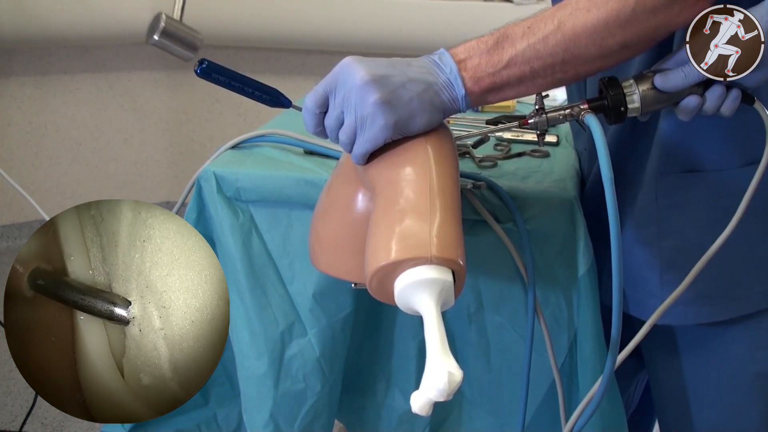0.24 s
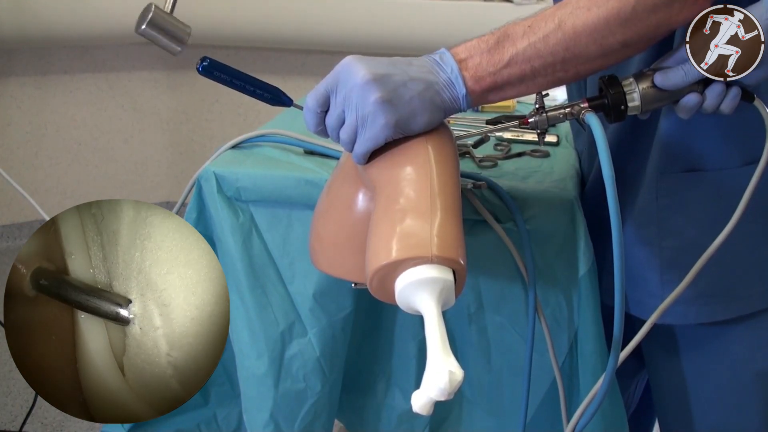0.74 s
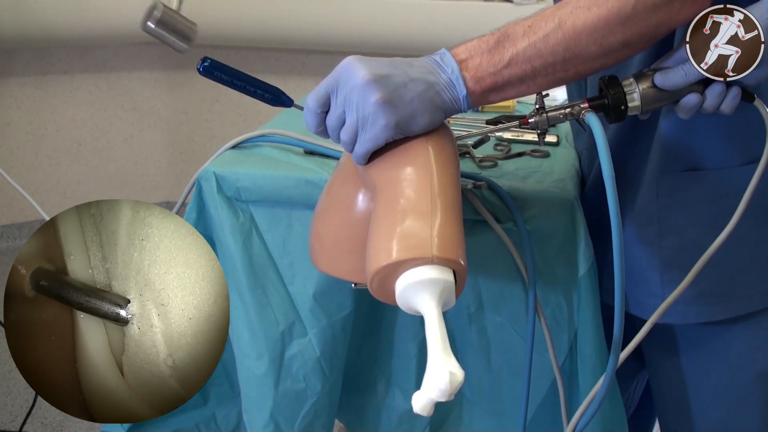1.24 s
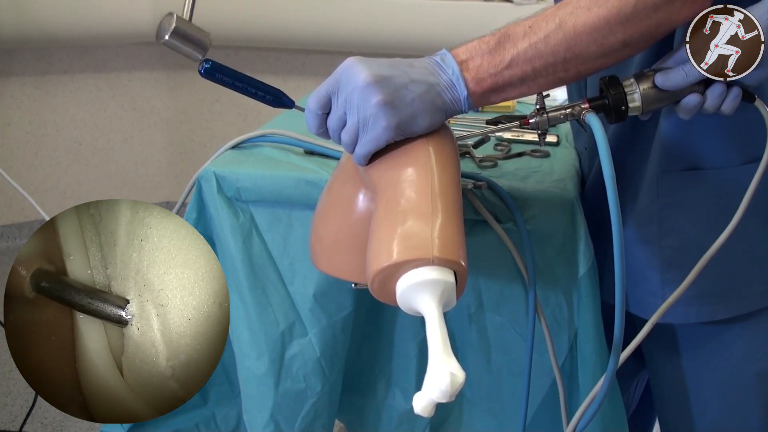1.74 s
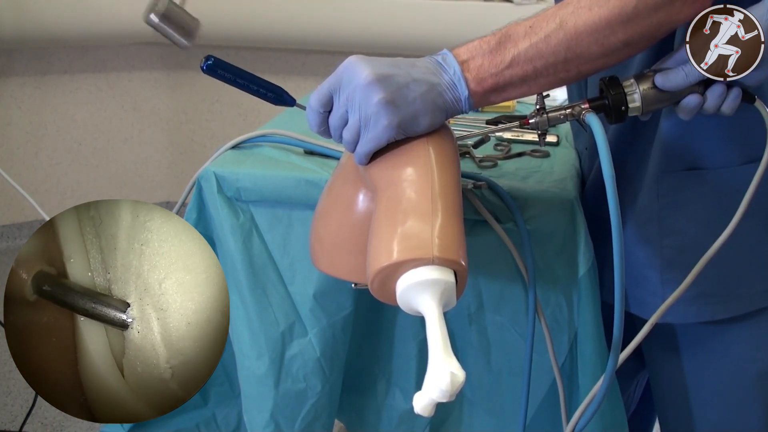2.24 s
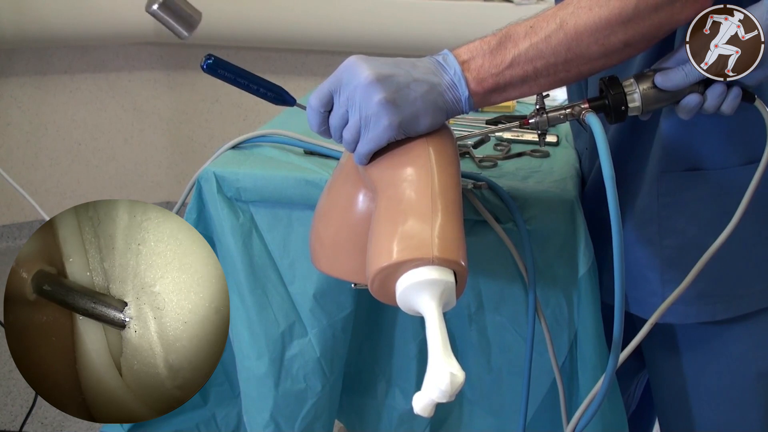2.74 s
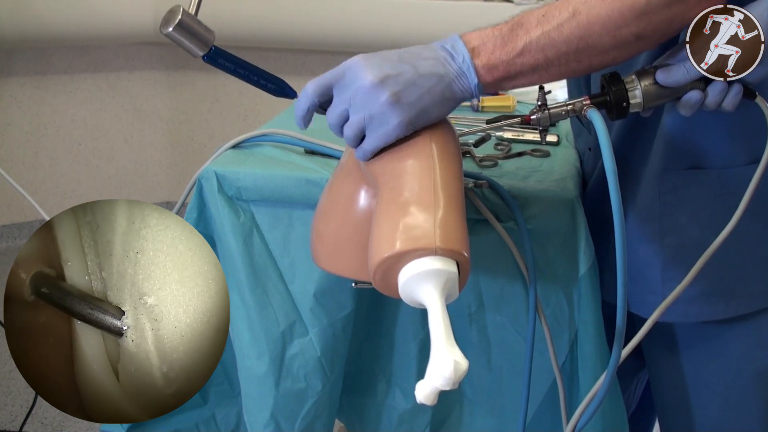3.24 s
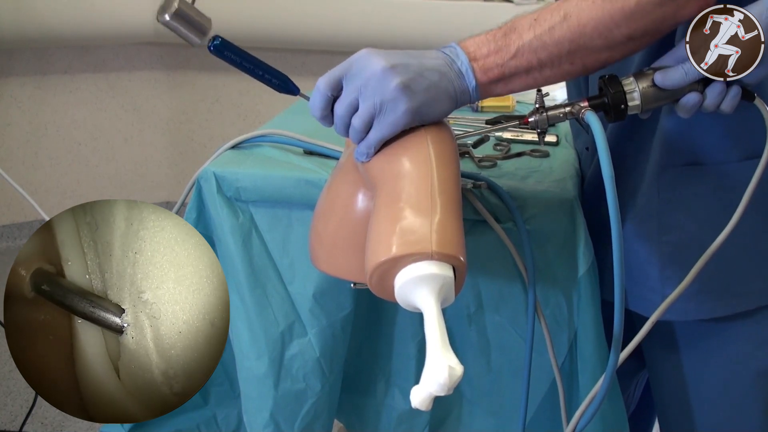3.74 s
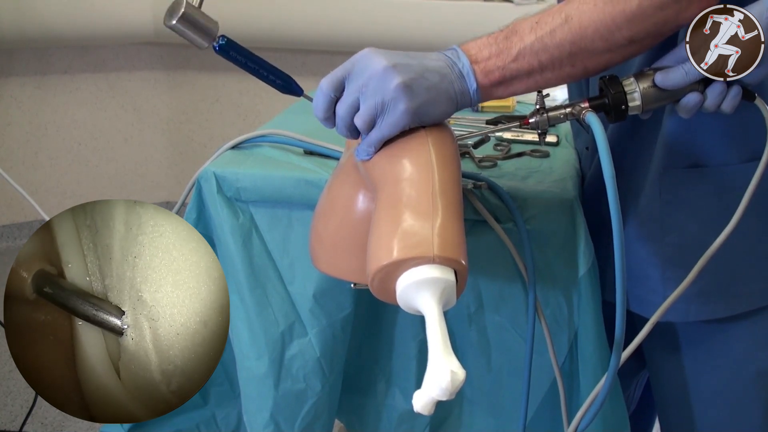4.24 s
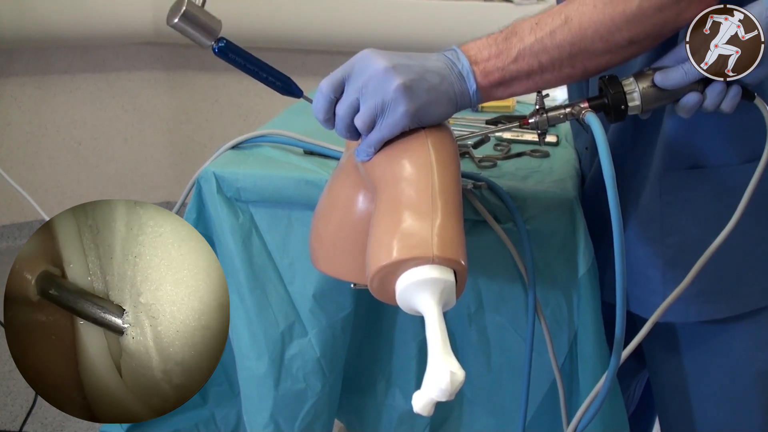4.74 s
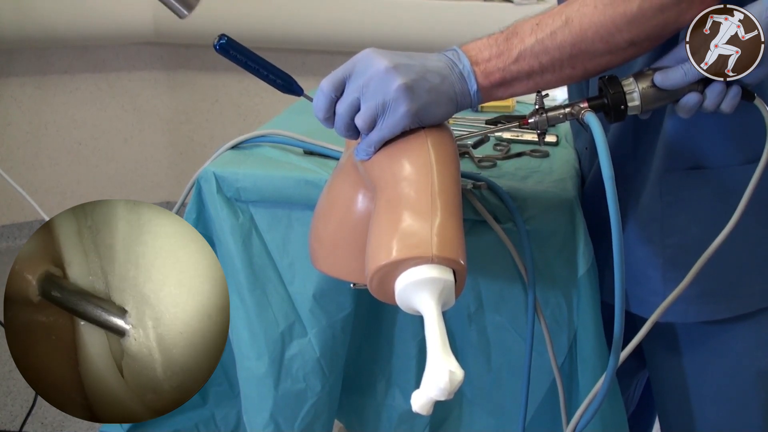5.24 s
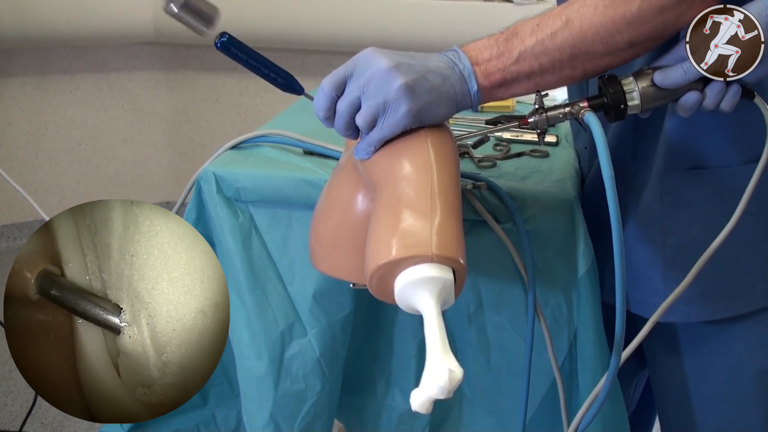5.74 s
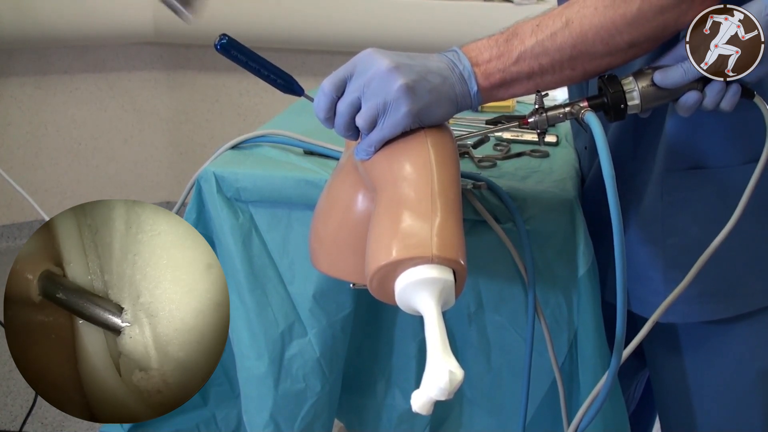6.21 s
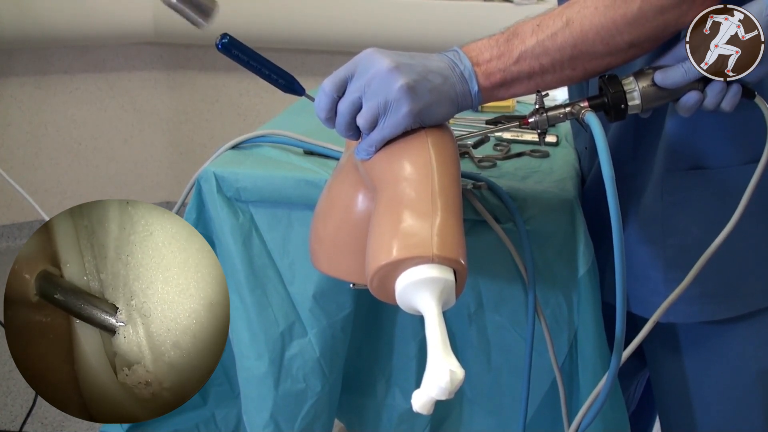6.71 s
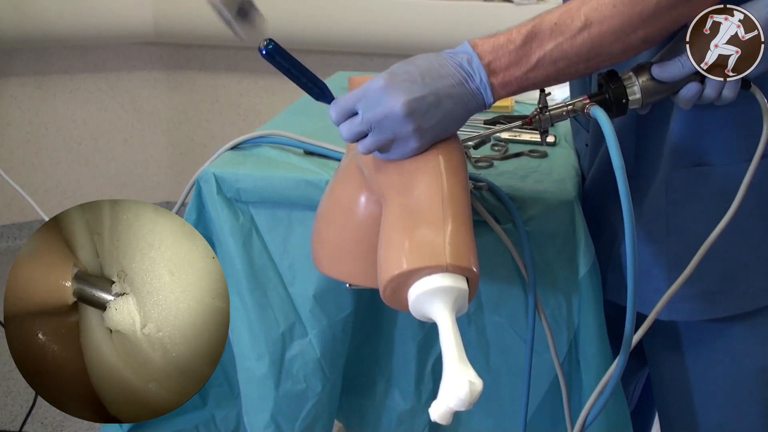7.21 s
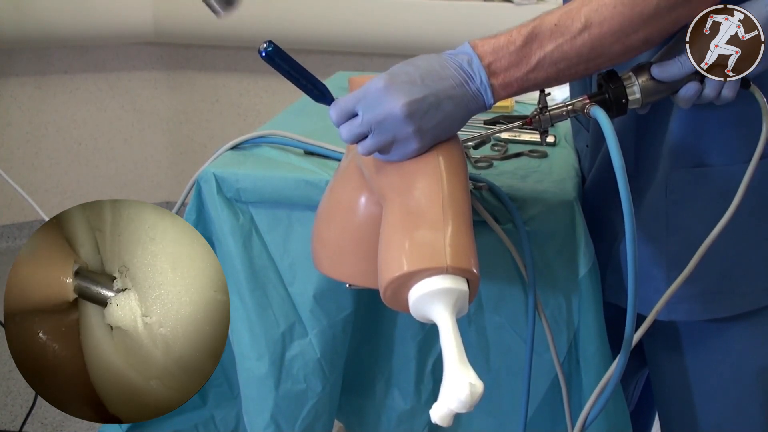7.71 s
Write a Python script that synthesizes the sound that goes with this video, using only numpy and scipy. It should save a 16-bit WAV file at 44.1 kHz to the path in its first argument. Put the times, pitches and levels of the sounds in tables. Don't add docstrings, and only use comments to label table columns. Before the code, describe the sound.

In a small hard-walled room, soft ventilation noise with a slightly wavering rumble and a thin, faint fan whine runs throughout. At the very start a steel mallet barely touches a steel awl, then from about 0.2 s it taps quickly, settling to roughly three blows a second. Each blow is a dry crack and bright steel click, a short thud from the padded model and table, and a brief high ring of the mallet head, followed by close echoes, a small room tail and a very faint shimmer of loose instruments. Taps strengthen slightly until 2.6 s, weaken, and almost miss near 3.4 s. From 3.7 s they return firmer, with a deeper thud as the point seats, and keep growing through 6.6 s. From 6.9 s four hard blows come, the loudest, slightly clipped at the camera microphone, the last at 7.9 s just before the end.

```python
import sys
import numpy as np
from scipy import signal
from scipy.fft import rfft, irfft
from scipy.io import wavfile
from scipy.ndimage import uniform_filter1d

SR = 44100
rng = np.random.default_rng(int(sys.argv[2]) if len(sys.argv) > 2 else 0)


def dump(signal):
    limited = np.clip(np.atleast_2d(signal).T, -1, 1)
    pcm = np.round(limited * 32767).astype(np.int16)
    wavfile.write(sys.argv[1], SR, pcm)


def undo_db(level):
    steps = np.asarray(level, float) / 20
    return 10 ** steps


N = 351463


def decay(t, t60_s):
    return np.exp(-np.log(1000) * t / t60_s)


def ring(modes, t, detune, scatter_db):
    hz, db, t60_s = np.transpose(modes)[:, :, None]
    level_chance, pitch_chance = rng.standard_normal((2, len(modes), 1))
    envelope = undo_db(db + scatter_db * level_chance) * decay(t, np.maximum(t60_s, .002))
    sines = -envelope * np.sin(2 * np.pi * hz * (1 + detune * pitch_chance) * t)
    return np.array([sines[0::2].sum(axis=0), sines[1::2].sum(axis=0)])


def band_pass(x, low_hz, high_hz):
    return signal.sosfilt(signal.butter(2, [low_hz, high_hz], "bandpass", fs=SR, output="sos"), x)


def crack(burst, top_db):
    middle = undo_db(-6) * band_pass(burst, 820, 5660)
    top = undo_db(top_db) * band_pass(burst, 8400, 21000)
    return np.array([middle, top])


# f/Hz, level/dB, t60/s
HANDLE_MODES = [(1011, -13.5, 0.024), (1330, -18.5, 0.013), (1965, -12, 0.011), (2536, -7, 0.01),
                (2880, -11.5, 0.012), (4430, -18, 0.0055)]


def handle(t, seat):
    HANDLE_DB, GRIP_DB, SEAT_DB = -7, 1, -2.5
    return undo_db(HANDLE_DB + GRIP_DB + SEAT_DB * seat) * ring(HANDLE_MODES, t, .02, 1.5)


# f/Hz, level/dB, t60/s
FACE_MODES = [(5830, -5, 0.0045), (6650, 3.5, 0.0039), (7005, -11, 0.013), (8950, -16.5, 0.0068),
              (10300, -15, .005)]


def faces(t, seat, free_db):
    FACES_DB, BRIGHT_DB, SEAT_DB = 11.5, -18.5, -2
    FREE_DB_PER_DB = -0.058
    return undo_db(FACES_DB + BRIGHT_DB + FREE_DB_PER_DB * free_db + SEAT_DB * seat) * ring(FACE_MODES, t, .012, 1)


# f/Hz, level/dB, t60/s
MODEL_MODES = [(317, -11.5, 0.052), (358, -6.5, 0.03), (450.2, 0, 0.039), (588, -2.5, 0.025),
               (707.5, -6, 0.039), (784, -8, 0.026), (852, -8, 0.041)]


def model(t, seat):
    MODEL_DB, THUD_DB, SEAT_THUD_DB = 7, -23, 4
    UPPER_DB, SEAT_UPPER_DB = 6, -9
    low = ring(MODEL_MODES[:4], t, .02, 1)
    upper = undo_db(UPPER_DB + SEAT_UPPER_DB * seat) * ring(MODEL_MODES[4:], t, .03, 1.5)
    return undo_db(MODEL_DB + THUD_DB + SEAT_THUD_DB * seat) * (low + upper)


# f/Hz, level/dB
HEAD_MODES = [(3280, -9), (3332, -2), (3410, -1.5), (3470, -12)]


def head(t, seat, ring_db, free_db):
    RING_DB, T60_S, RISE_S = 13, .038, .003
    LOWER_DB_PER_DB, SEAT_LOWER_DB = .5, -6
    lower_db = (LOWER_DB_PER_DB - 1) * max(free_db, 0) + SEAT_LOWER_DB * seat
    modes = []
    for k, (hz, db) in enumerate(HEAD_MODES):
        modes.append((hz, db + RING_DB + ring_db + lower_db * (k < 2), T60_S))
    return ring(modes, t, .003, 2) * (1 - np.exp(-t / RISE_S))


# f/Hz, level/dB, t60/s
NECK_MODES = [(3200, -11, 0.004), (3356, -12, 0.0056), (3653, -20.5, 0.03)]


def neck(t, seat, free_db):
    NECK_DB, FREE_DB_PER_DB, SEAT_DB = 0, 0.25, -3
    return undo_db(NECK_DB + FREE_DB_PER_DB * free_db + SEAT_DB * seat) * ring(NECK_MODES, t, .012, 1.5)


# f/Hz, level/dB, t60/s
TABLE_MODES = [(36, -44, .25), (66, -38, .09), (95, -33.5, .09), (116, -29, .095)]


def table_boom(t, blow_db):
    TABLE_DB, BLOW_DB_PER_DB, RISE_S = -1, 0.73, 0.0064
    boom = ring(TABLE_MODES, t, .02, 1.5).sum(axis=0) * (1 - np.exp(-(t / RISE_S) ** 2))
    return undo_db(TABLE_DB + BLOW_DB_PER_DB * blow_db) * boom


# t/s, peak level/dB, head ring level/dB re blow, crack top level/dB re blow
TAPS_TABLE = [(0.04, -40.5, -30, -33), (0.1794, -16, -40, 6), (0.398, -15, -22.5, -7), (0.622, -13, -27, 0),
              (0.875, -11.5, -26, 0), (1.143, -11.5, -27, 2.5), (1.4306, -10, -24, 3),
              (1.721, -10.5, -15, -3), (2.0263, -9.5, -21, 2.5), (2.3277, -10, -21.5, 2),
              (2.6126, -9, -16.5, -3), (2.914, -11.5, -28, -14), (3.189, -13.5, -48, 6),
              (3.423, -28.5, -49, -28), (3.7003, -10.5, -33, 0), (3.964, -11, -25, -15),
              (4.2324, -9, -31, -7), (4.5063, -6.5, -16.5, -3), (4.794, -5.5, -18.5, -2),
              (5.094, -6, -29, -2), (5.3827, -6, -23, -1), (5.6888, -5.5, -28, -5), (5.994, -3.5, -24, -3),
              (6.3174, -5, -22.5, -1.5), (6.631, -4.5, -21, -3), (6.94, 0, -46, -0.5),
              (7.2702, 0.5, -43, -1), (7.603, -0.5, -43, 1.5), (7.93, 0, -22, 0)]
# t/s, seating/0-1
SEATING_TABLE = [
    (0, 0.33),
    (.9, 0.04),
    (2.7, 0.14),
    (3.2, 0.58),
    (4.3, 0.79),
    (6.6, .8),
    (7, 0.95),
    (7.97, 1),
]


def taps():
    USUAL_RING_DB = -25
    CONTACT_HZ, TOP_DB_PER_OCTAVE = 13000, 28.5
    TOP_DB, HARDNESS_DB_PER_DB, CRACK_T60_S = -17.5, .6, 0.021
    HEAD_TO_WALLS_DB, MODEL_TO_WALLS_DB = 4, -7
    RAGGED_TO_WALLS = .4
    BASS_CUT_HZ = 270
    t = np.arange(SR // 6) / SR
    small = np.zeros((5, N + len(t)))
    table = np.zeros((5, N + len(t)))
    fade = decay(t, CRACK_T60_S)
    for s, blow_db, ring_db, top_db in TAPS_TABLE:
        seat = np.interp(s, *np.transpose(SEATING_TABLE))
        free_db = ring_db - USUAL_RING_DB
        contact_hz = CONTACT_HZ * 2 ** (top_db / TOP_DB_PER_OCTAVE)
        contact = signal.butter(3, contact_hz, fs=SR, output="sos")
        steel = handle(t, seat) + faces(t, seat, free_db) + neck(t, seat, free_db)
        thud = model(t, seat)
        head_ring = head(t, seat, ring_db, free_db)
        direct = steel + thud + head_ring
        radiated = steel + undo_db(MODEL_TO_WALLS_DB) * thud + undo_db(HEAD_TO_WALLS_DB) * head_ring
        direct, radiated = signal.sosfilt(contact, [direct, radiated])
        crack_top_db = top_db + TOP_DB + HARDNESS_DB_PER_DB * blow_db
        ragged = crack(rng.standard_normal(len(t)) * fade, crack_top_db)
        even = crack((t == 0) * np.linalg.norm(fade), crack_top_db)
        to_microphone = (direct + ragged).sum(axis=0)
        crack_to_walls = RAGGED_TO_WALLS * ragged + np.sqrt(1 - RAGGED_TO_WALLS ** 2) * even
        here = slice(int(s * SR), int(s * SR) + len(t))
        small[:, here] += undo_db(blow_db) * np.vstack([to_microphone, radiated, crack_to_walls])
        table[:2, here] += table_boom(t, blow_db)
    small = signal.sosfilt(signal.butter(5, BASS_CUT_HZ, "highpass", fs=SR, output="sos"), small)
    return (small + table)[:, :N]


# f/Hz, level/dB, t60/s
TAIL_TONES = [(1110, -1, .5), (1390, -5, .4), (2390, -6, .35), (2700, -5, .35), (3600, -2, .25),
              (4240, -10, .45), (4800, -10, .45), (5400, -7, .45), (6160, -8, .4), (7250, -6, .25),
              (9200, -12, .35), (10600, -13, .3)]


def tail_tones():
    TONES_DB, RISE_S = -42, .01
    t = np.arange(SR // 3) / SR
    out = np.zeros(N + len(t))
    for s, blow_db, *_ in TAPS_TABLE:
        sing = ring(TAIL_TONES, t, .012, 4).sum(axis=0) * (1 - np.exp(-t / RISE_S))
        start = int(s * SR)
        out[start:start + len(t)] += undo_db(TONES_DB + blow_db) * sing * np.cos(np.pi / 2 * t / t[-1])
    return out[:N]


def on_log_axis(hz, points_hz, values):
    return np.interp(np.log(np.maximum(hz, 1)), np.log(points_hz), values)


def echoes(delays):
    spikes = np.zeros(SR)
    for delay_s, echo_db in delays:
        spikes[int(delay_s * SR)] += undo_db(echo_db)
    return spikes


# delay t/s, level/dB
NEAR_ECHOES = [(.00175, -1.5), (.0036, -10), (.0049, -12), (.0063, -14)]
# delay t/s, level/dB
TREBLE_GLINTS = [(.0166, -16), (.0178, -21), (.0222, -25)]
# f/Hz, level/dB, t60/s
ROOM_BANDS = [(61, -36.5, 0.57), (184, -37.5, 0.58), (602, -28, 0.5), (1780, -38, 0.46), (3350, -38.5, 0.7),
              (7300, -40, 0.49), (12000, -34.5, 0.37), (16400, -58.5, 0.48)]


def room():
    BUILD_S = .006
    SCATTER_DB, SCATTER_T60_S = -25, .025
    t = np.arange(SR) / SR
    hz = np.fft.rfftfreq(SR, 1 / SR)
    points_hz, db, t60_s = np.transpose(ROOM_BANDS)
    dense = rfft(rng.standard_normal((4, SR)))
    late = 0
    for k, share in enumerate(np.eye(len(ROOM_BANDS))):
        band = irfft(dense * on_log_axis(hz, points_hz, share), SR)
        late = late + undo_db(db[k]) * band * decay(t, t60_s[k])
    late *= 1 - np.exp(-(t / BUILD_S) ** 2)
    early = undo_db(SCATTER_DB) * rng.standard_normal(SR) * decay(t, SCATTER_T60_S)
    early[0] = 1
    early += echoes(NEAR_ECHOES) + band_pass(echoes(TREBLE_GLINTS), 4500, 9000)
    return np.vstack([early, late])


def walk(rate_hz):
    k = int(SR / rate_hz)
    held = np.repeat(rng.standard_normal(N // k + 1), k)
    return uniform_filter1d(uniform_filter1d(held, k), k)[:N]


# f/Hz, level/dB per Hz
AIR_SPECTRUM = [(25, -2), (40, -3.5), (110, -7), (150, -10.5), (266, -6.5), (1200, -14), (1540, -20),
                (16000, -48)]


def ventilation():
    AIR_DB, SPLIT_HZ = -53, 150
    hz = np.fft.rfftfreq(N, 1 / SR)
    noise = rfft(rng.standard_normal(N)) * undo_db(on_log_axis(hz, *np.transpose(AIR_SPECTRUM)))
    rumble = irfft(noise * (hz < SPLIT_HZ), N) * undo_db(2.2 * walk(3.76))
    hiss = irfft(noise * (hz >= SPLIT_HZ), N) * undo_db(0.39 * walk(5.5))
    return (rumble + hiss) * undo_db(AIR_DB) / np.std(rumble + hiss)


def fan():
    FAN_HZ, FAN_DB = 909, -62
    phase = 2 * np.pi * np.cumsum(FAN_HZ + 6 * walk(5)) / SR
    return np.sin(phase) * undo_db(FAN_DB + 3 + 3 * walk(6))


def scene():
    in_room = signal.fftconvolve(taps(), room(), axes=1).sum(axis=0)[:N]
    return (in_room + tail_tones() + ventilation() + fan())[None]


def band_limit(x):
    return signal.sosfilt(signal.butter(12, 17040, fs=SR, output="sos"), x)


def record(dry):
    OVERLOAD, STEP_HZ, EDGE_HZ = .92, 15850, 16800
    step = signal.ellip(6, .2, 18, STEP_HZ, fs=SR, output="sos")
    edge = signal.ellip(8, .2, 60, EDGE_HZ, fs=SR, output="sos")
    mix = signal.sosfilt(np.vstack([step, edge]), np.clip(dry, -OVERLOAD, OVERLOAD))
    return band_limit(mix)


dry = scene()
out = record(dry)
dump(out)
```